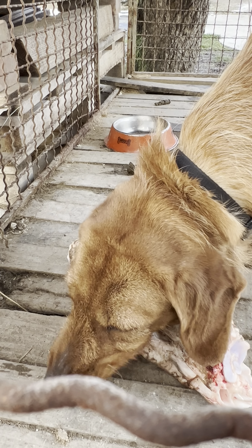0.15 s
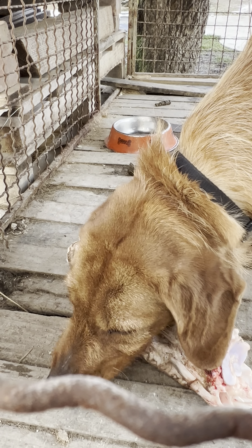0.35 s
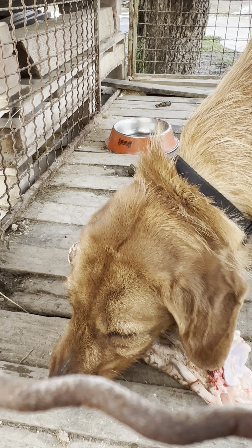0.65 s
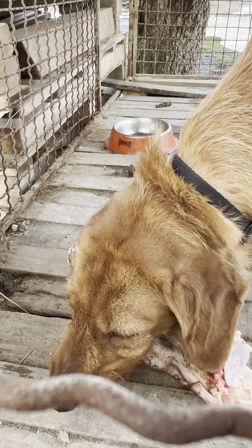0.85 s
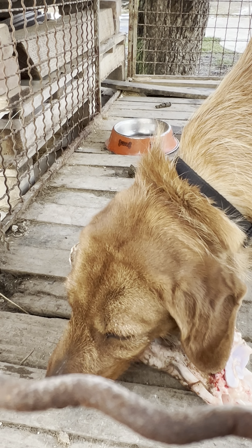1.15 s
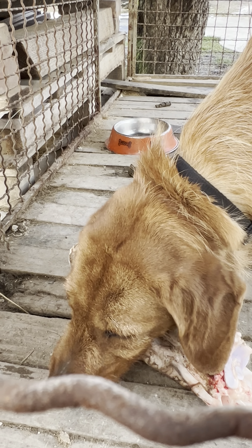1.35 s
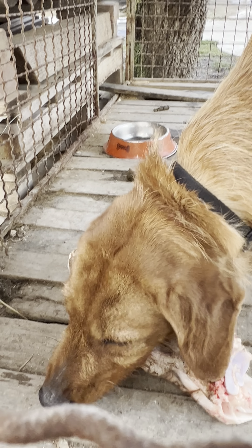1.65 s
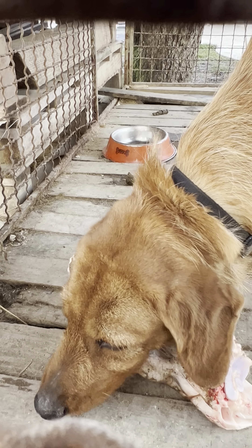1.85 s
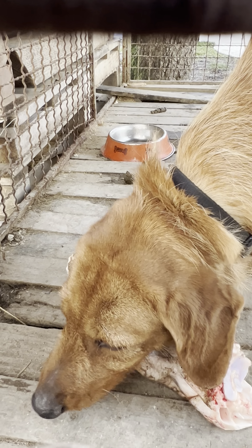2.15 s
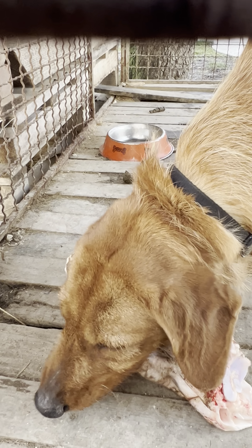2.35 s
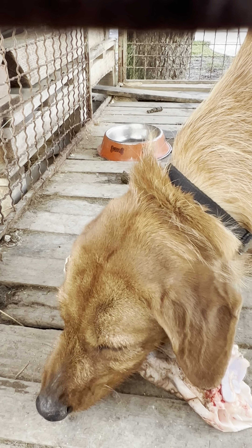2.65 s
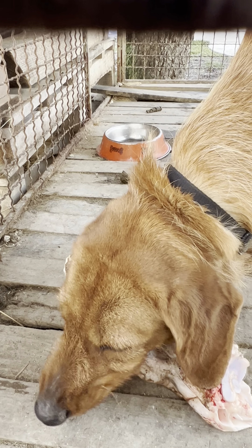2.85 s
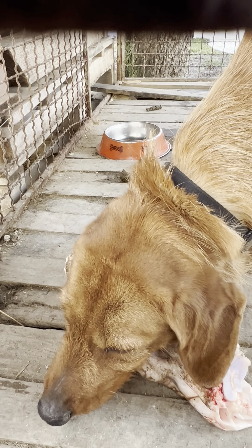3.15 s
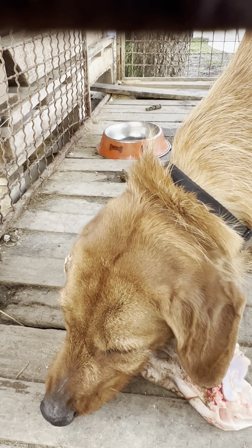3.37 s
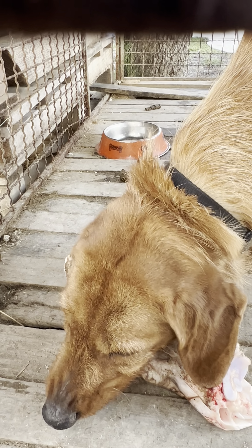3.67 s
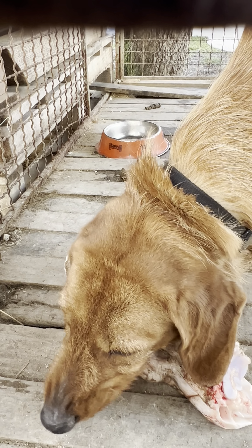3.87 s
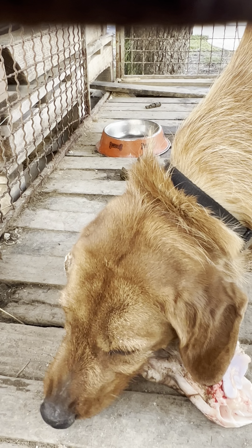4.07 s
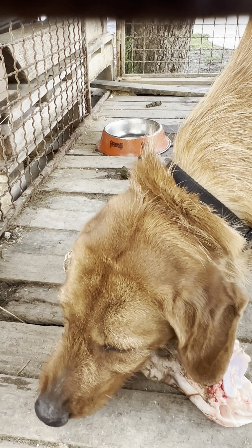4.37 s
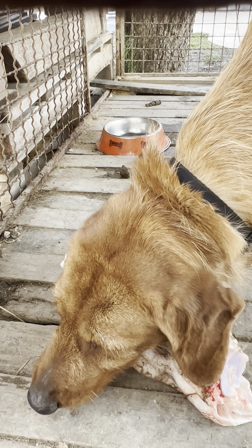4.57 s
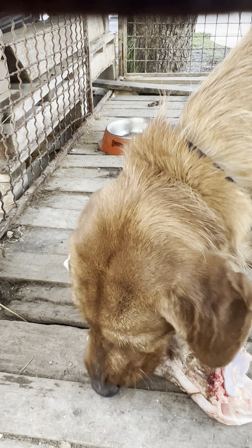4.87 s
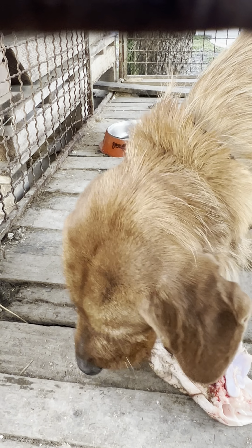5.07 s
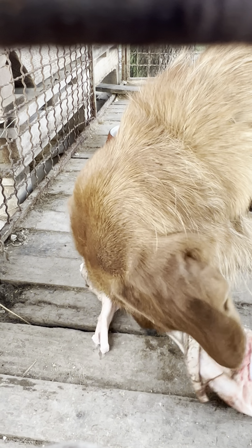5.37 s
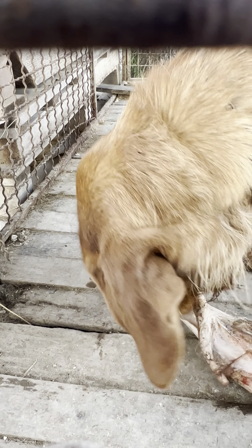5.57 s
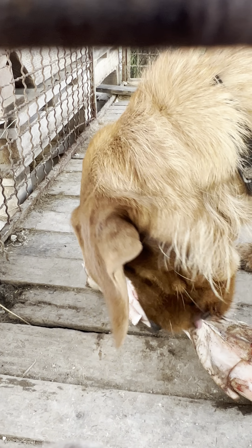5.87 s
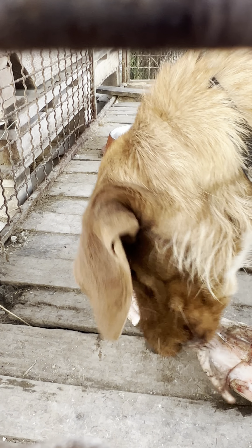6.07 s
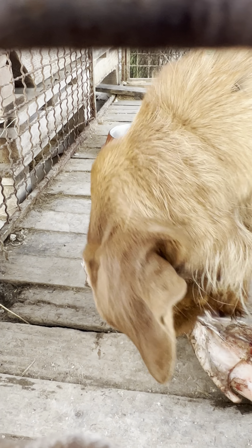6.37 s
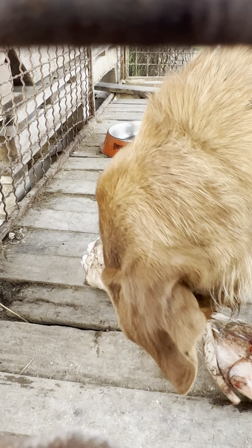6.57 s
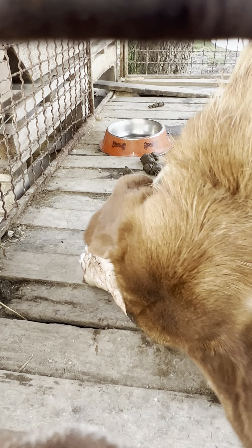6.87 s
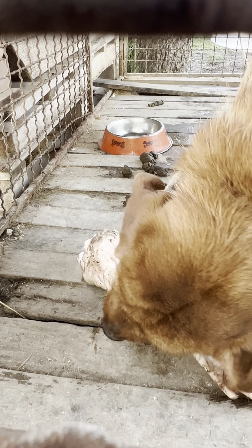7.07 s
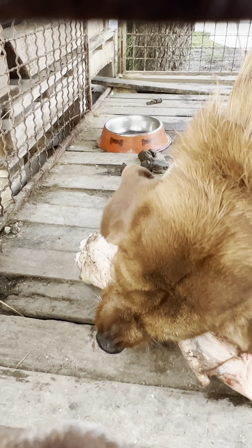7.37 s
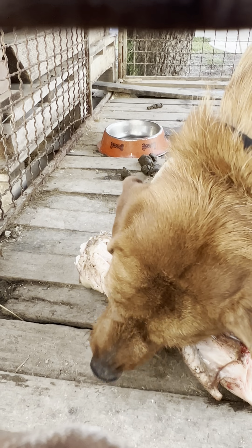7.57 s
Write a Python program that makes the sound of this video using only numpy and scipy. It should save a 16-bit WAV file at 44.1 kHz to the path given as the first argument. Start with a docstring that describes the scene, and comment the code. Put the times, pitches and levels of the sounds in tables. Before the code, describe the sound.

Close, irregular crunching of dog teeth on bone with wet mouth smacks, broken midway by a heavy thump and rattling planks.

```python
"""An outdoor pen with a plank floor: a dog gnaws a raw bone close to a phone with two microphone ports.
Teeth crack and scrape the bone, exciting its cavity, body and splinter modes; the wet mouth clicks.
Bone and paws knock the planks into damped vibration, and one blow sends a bending wave through them,
hard enough to shake the wire fence. Distant traffic rumbles under soft hiss and a few faint hoots."""
import sys
import numpy as np
from scipy import signal
from scipy.fft import rfft, irfft, next_fast_len
from scipy.io import wavfile
from scipy.ndimage import uniform_filter1d

SR = 44100
rng = np.random.default_rng(int(sys.argv[2]) if len(sys.argv) > 2 else 0)


def dump_mix(stems):
    """Bounce the given channels to the path in sys.argv[1] as a 16-bit WAV at rate SR."""
    frames = np.atleast_2d(stems).T  # one column per channel
    limited = np.clip(frames, -1, 1)  # hard clip at full scale
    pcm = np.round(limited * 32767).astype(np.int16)
    wavfile.write(sys.argv[1], SR, pcm)


N = 340452

# Spectrum of the outdoor hiss. Each row: frequency in Hz, relative density in dB.
AIR_SPECTRUM = [(12, -50), (20, -8), (68, -6), (399, -23.5), (690, -23.5), (810, -27.5), (930, -26),
                (2080, -24.5), (4180, -47), (4940, -47.5), (5680, -51), (8890, -40.5), (11100, -54.5),
                (13200, -69.5), (16000, -77.5)]
# Likeness of the hiss at the two ports. Each row: frequency in Hz, coherence from 0 to 1.
AIR_COHERENCE = [(60, 1), (200, 0.61), (700, 0.19), (2400, 0.47), (4400, 0.17), (9000, 0.2)]
# Traffic drone. Each row: time in seconds, level in dB.
TRAFFIC = [(0, -55.5), (.75, -57), (2, -55), (2.9, -57), (7.3, -57), (7.6, -70.5), (7.72, -62.5)]
# Distant hoots. Each row: start in seconds, length in seconds, pitch in Hz, level in dB.
HOOTS = [(.785, 0.08, 714, -59), (0.995, 0.057, 640, -64), (1.469, 0.057, 715, -54.5),
         (1.627, 0.057, 665, -54.5), (2.807, 0.089, 702, -63), (2.883, 0.11, 654, -68),
         (4.045, 0.092, 559, -56), (4.162, 0.038, 737, -56), (5.243, 0.061, 724, -59)]
# Swing of a loose plank. Each row: time in seconds, pitch in Hz, level in dB.
GROAN = [(4.512, 160, -45), (4.531, 169.4, -28.5), (4.559, 170.7, -39.5), (4.614, 130.7, -42.5),
         (4.674, 122, -39), (4.7, 114, -66)]
# Rattle of the shaken planks. Each row: time in seconds, level in dB.
SHAKING = [(3.08, -61), (3.12, -41), (3.25, -42.5), (3.5, -40.5), (3.85, -50), (3.95, -43), (4.2, -55.5),
           (4.45, -42), (4.6, -44.5), (4.79, -52.5), (4.9, -84)]
# Knocks: dull jaw thumps that follow the big crunches, and knocks and bounces on the planks. Each row: peak in
# seconds, level in dB, pitch in Hz, length in ms.
KNOCKS = [(0.309, -42.5, 226, 17), (0.64, -33, 198, 13), (0.982, -50, 267, 12), (1.298, -35.5, 170, 16),
          (1.402, -49, 289, 6.8), (2.363, -35.5, 186, 7.7), (2.603, -43.5, 180, 10),
          (2.652, -35, 200, 16.7), (3.13, -12, 183, 3.5), (3.157, -29, 148, 14),
          (3.181, -18.5, 156.4, 14.3), (3.221, -21, 159, 4.1), (3.262, -26, 154.6, 4.8),
          (3.297, -23.5, 132.8, 5.4), (3.384, -28.5, 140.7, 45), (3.444, -27.5, 129, 9.4),
          (3.524, -34, 144, 8.1), (3.753, -27.5, 187, 2.5), (3.874, -30, 227.4, 10),
          (3.89, -25, 231.5, 6.6), (3.903, -30, 227, 31), (3.997, -38.5, 193.6, 26), (4.3, -34, 221, 10.5),
          (4.477, -24.5, 203.5, 29.5), (4.507, -22.5, 152, 11), (5.316, -36.5, 246.7, 5.2),
          (5.75, -33.5, 233, 2.6), (5.909, -33.5, 250.4, 7.8), (6.435, -41, 143, 3.9),
          (6.732, -37.5, 283, 2.9), (7.21, -25.5, 175, 5.4)]
# Modes of the planks, the fence wires and the bone's cavity, body and splinters.
# Each row: frequency in Hz, bandwidth in Hz, relative gain in dB.
PLANK_MODES = [(101.6, 30, 4.5), (181, 104, 2), (238.6, 64, 1.5), (337, 120, -11.5)]
FENCE_MODES = [(285, 0.7, -18), (297.7, 1.7, -14.5), (352.3, 8.5, -21)]
CAVITY_MODES = [(352, 200, -6), (482, 60, 5), (670, 75, 1), (950, 110, 2), (1170, 110, 1)]
BONE_MODES = [(1020, 1500, -9), (1454, 230, -1), (1806, 208, -5), (2158, 212, -1.5), (2524, 470, -3.5),
              (3000, 1110, -4.5), (4310, 1400, -9)]
SPLINTER_MODES = [(4990, 1400, 2.5), (6250, 2730, 2.5), (8020, 2080, 6), (10280, 6000, 4.5),
                  (11900, 7400, -0.5), (14560, 2900, -5)]
# Strokes of bone over wood. Each row: start in seconds, end in seconds, level in dB.
DRAGS = [(3.043, 3.199, -49), (3.722, 3.787, -52), (4.256, 4.33, -50), (4.32, 4.51, -57.5),
         (4.862, 4.949, -56.5), (5.225, 5.322, -62), (5.881, 5.934, -57), (6.814, 6.845, -54),
         (7.16, 7.411, -57)]
# Grinding and smacking between the cracks. Each row: time in seconds, level in dB.
GRINDING = [(0, -59), (.36, -69.5), (.5, -59), (1.07, -68), (1.72, -64.5), (2.04, -58.5), (2.43, -64),
            (3.33, -67.5), (3.48, -60.5), (4.1, -65.5), (4.35, -68), (5.05, -77.5), (5.31, -68.5),
            (5.72, -71), (6.03, -69), (6.78, -72.5), (6.9, -78), (7.25, -65), (7.72, -68)]
# Hollow clacks of bone on wood.
# Each row: peak in seconds, cavity level in dB, length in ms, favoured cavity frequency in Hz.
CLACKS = [(.1804, -51, 8, 710), (1.195, -46.5, 7.4, 393), (1.289, -40.5, 20, 484), (1.5619, -45.5, 20, 656),
          (1.848, -51.5, 8.2, 834), (1.8823, -45.5, 4.9, 704), (2.2788, -49, 9.8, 654),
          (2.538, -42, 4.1, 660), (3.0932, -22.5, 6.3, 910), (3.1295, -41, 62, 416),
          (3.1753, -28.5, 3.8, 404), (3.4285, -28, 8.8, 767), (3.8717, -27.5, 4.2, 416),
          (3.888, -31, 4.7, 397), (3.898, -28, 4.4, 720), (3.9424, -53, 39, 900), (4.2996, -48, 52, 455),
          (4.4436, -50.5, 78, 692), (4.474, -45, 15, 400), (4.8645, -39, 7, 605), (5.0854, -45, 4.2, 1150),
          (5.2367, -50, 5, 950), (5.3147, -49, 21, 470), (5.4841, -49.5, 3.3, 640), (5.9176, -35, 6.7, 485),
          (5.9328, -45.5, 9.6, 458), (6.306, -46, 19.5, 476), (6.5927, -45.5, 6.5, 680),
          (6.7312, -43.5, 39, 478), (6.8225, -56, 17, 1200), (7.0711, -51, 4.9, 493),
          (7.1518, -49, 3.4, 514), (7.2178, -53, 96, 403), (7.4203, -48.5, 9.9, 920),
          (7.483, -50.5, 5.5, 958), (7.572, -48.5, 15, 930)]
# Wet mouth clicks.
# Each row: peak in seconds, treble level in dB, length in ms, favoured treble frequency in Hz.
CLICKS = [(0.044, -43.5, 1.7, 5460), (0.3397, -47, 5.1, 8400), (0.3986, -42.5, 1.4, 7580),
          (0.589, -45, 4.1, 7200), (0.816, -50, 3.7, 8300), (1.0676, -48, 3, 8560), (1.252, -45, 7.1, 7400),
          (1.3166, -27.5, 0.76, 8750), (1.454, -46, 5.5, 6560), (1.555, -41, 1.9, 6060),
          (1.7556, -38.5, 1.1, 6760), (1.7885, -39.5, 1.5, 9000), (1.9495, -39, 6.8, 9400),
          (2.16, -46, 2.2, 7000), (2.206, -44.5, 2.6, 6560), (2.2407, -46.5, 3.5, 9020),
          (2.252, -42.5, 2, 6040), (2.453, -44, 2.5, 7450), (2.525, -43.5, 2.5, 6360),
          (2.695, -48, 5.2, 8800), (2.818, -41, 6.8, 8100), (2.91, -39.5, 4.5, 5830), (3.136, -42, 2, 7950),
          (3.151, -50, 1.8, 8700), (3.275, -46, 4.9, 9200), (3.324, -34, 1.9, 7500),
          (3.467, -51, 6.4, 8390), (3.491, -51.5, 14, 8000), (3.575, -43, 4.6, 5900),
          (3.671, -41, 2.2, 8380), (3.676, -36, 3.3, 8800), (3.686, -38, 4.1, 9370), (3.725, -45, 3, 8500),
          (4.0282, -40.5, 2.3, 8500), (4.128, -40.5, 2.4, 7600), (4.257, -34, 3, 6520),
          (4.3232, -40.5, 3.8, 9300), (4.6034, -48.5, 3.3, 8400), (5.135, -48.5, 2.2, 8100),
          (5.2915, -47, 4.4, 6900), (5.3827, -54, 4, 5650), (5.77, -51.5, 4.7, 8400),
          (6.024, -52, 37, 8700), (6.256, -56.5, 2.1, 6500), (6.8, -54, 12, 8060),
          (6.834, -51.5, 2.6, 8600), (7.092, -50, 3, 6100), (7.304, -53, 4.5, 6500),
          (7.3438, -41, 5.4, 6200), (7.384, -51.5, 3, 7900), (7.415, -51, 6.5, 6760),
          (7.6625, -48, 1.7, 9830)]
# Cracks of teeth on bone, and the sharp ticks of bone striking wood. Each row: peak in seconds,
# body level in dB, treble relative to it in dB, length in ms, favoured body frequency in Hz.
CRACKS_AND_TICKS = [(0.091, -47.5, -26, 8.8, 1770), (0.2896, -28, -8, 12.2, 1590),
                    (0.2956, -23.5, -6, 4.4, 2470), (0.3021, -36.5, -1.5, 22, 2600),
                    (0.4162, -42, -8, 1.7, 2320), (0.54, -32.5, -9.5, 1.8, 1390),
                    (0.622, -25, -7, 8.6, 1940), (0.6307, -23.5, -3, 3.5, 1510),
                    (0.787, -46.5, -13, 4.1, 2400), (0.909, -41.5, -5.5, 3.5, 1540),
                    (0.9739, -28.5, -12.5, 10, 1470), (1.095, -51.5, -2.5, 29, 2320),
                    (1.1364, -45, -14, 1.8, 2510), (1.1933, -43, -19, 5.1, 1290),
                    (1.284, -32.5, -8, 16, 1800), (1.4002, -39, -5.5, 3, 2370),
                    (1.5634, -44, -9, 5.1, 1420), (1.664, -39.5, -3, 14, 1720),
                    (1.694, -43, -25, 3.2, 2220), (1.815, -41.5, -26, 3.4, 2550),
                    (1.979, -34.5, -5.5, 12, 1640), (2.094, -48, -3, 4.4, 2500),
                    (2.3425, -48.5, -6.5, 38, 2550), (2.3554, -41.5, -6, 15, 1750),
                    (2.4135, -48, 0, 3, 2430), (2.4907, -39.5, -34, 2.9, 2660),
                    (2.5973, -42.5, -1, 5.1, 2220), (2.637, -29, -7.5, 14.6, 1980),
                    (2.9583, -46.5, -23, 5.5, 1450), (2.971, -43.5, -8, 5.4, 1440),
                    (3.0248, -29.5, -7.5, 14.3, 1290), (3.0711, -43, -22, 6.2, 1980),
                    (3.0917, -28.5, -24, 0.89, 4150), (3.161, -37.5, 5.5, 0.85, 1080),
                    (3.1693, -41, -24, 4.7, 3150), (3.2152, -40.5, -8, 3.3, 1390),
                    (3.3127, -32.5, -7, 12.6, 1600), (3.613, -47, 1.5, 4.4, 1340),
                    (3.65, -26.5, -8.5, 12, 1700), (3.779, -44.5, -33, 5.2, 2300),
                    (3.8316, -37, -7, 2.9, 2300), (3.871, -37, -21, 1.5, 4200),
                    (3.888, -40, -18, 1.8, 4200), (3.897, -37, -21, 2.2, 4300),
                    (3.9808, -38.5, -11, 29, 1360), (3.9877, -36.5, -4, 8.8, 2040),
                    (4.057, -39.5, -5.5, 2, 2500), (4.103, -42.5, 1, 2.7, 2600),
                    (4.1125, -43, -10, 5.1, 2660), (4.2433, -43, -4, 4.7, 1390),
                    (4.7179, -52.5, -2.5, 33, 1910), (5.2355, -51, -7, 6.5, 2110),
                    (5.2845, -46, 5, 1.5, 3200), (5.432, -50, -1.5, 5.4, 3740),
                    (5.9081, -50.5, -5.5, 42, 2260), (5.948, -42.5, -15, 1.5, 2020),
                    (6.435, -56.5, 0, 29, 2530), (6.5456, -51.5, -10, 12, 2450),
                    (6.628, -51.5, -3.5, 4.4, 1770), (6.7012, -50.5, -10, 7.6, 2780),
                    (7.324, -46.5, 3.5, 11, 2360), (7.3299, -37.5, -14, 3.3, 2450),
                    (7.338, -40.5, -13, 5.7, 2520), (7.562, -51.5, -12, 11.5, 1660)]
# Phase between the ports. Each row: frequency in Hz, lead of the left in radians.
PORT_PHASE = [(0, 0), (690, -1.3), (1380, -0.0), (4130, -0.3), (4910, -2.7), (5510, -6.1), (5770, -6.2),
              (7490, -6.7), (12800, -9.3), (16200, -9.6)]
# Balance of the ports. Each row: frequency in Hz, left minus right in dB.
PORT_BALANCE = [(60, -4), (180, 5.5), (550, -0.5), (1650, -3), (4970, 1.5), (15000, -1)]

BLOW_S = 3.0863
EVENT_SAMPLES = 4000


def amp(db):
    """Amplitude ratio of a level in dB."""
    return 10 ** (np.asarray(db) / 20)


def unit_rms(x):
    """Normalisation to an rms of 1."""
    return x / np.sqrt(np.mean(x ** 2) + 1e-20)


def spectrum_at(points, hz):
    """Interpolation of a table on a log-frequency axis."""
    table_hz, value = np.transpose(points)
    return np.interp(np.log(hz + 1), np.log(table_hz + 1), value)


def curve(rows):
    """Linear interpolation of a level table at every sample."""
    return np.interp(np.arange(N) / SR, *np.transpose(rows))


def wander(noise, size):
    """Two moving averages leave a slow fluctuation of rms 1."""
    return unit_rms(uniform_filter1d(uniform_filter1d(noise, size), size))


def add(mix, start_s, sound):
    """Superposition of a sound on the mix."""
    part = mix[round(start_s * SR):][:len(sound)]
    part += sound[:len(part)]


def swell(length_s, rise_share, exponent=1):
    """Exponential growth and decay about t = 0; returns time and envelope."""
    t = np.arange(EVENT_SAMPLES) / SR - .03
    time_constant = np.where(t < 0, rise_share, 1 - rise_share) * length_s
    return t, np.exp(-(abs(t) / time_constant) ** exponent)


def ring(x, modes):
    """Modal resonance: two-pole filters share one drive or take a row each; the sum has rms 1."""
    out, drives = 0, np.broadcast_to(x, (len(modes), x.shape[-1]))
    for k, ((hz, width, db), drive) in enumerate(zip(modes, drives)):
        out = out + (-1) ** k * amp(db) * signal.lfilter(*signal.iirpeak(hz, hz / width, SR), drive)
    return unit_rms(out)


def favour(modes, hz, octaves, floor):
    """The point of contact weights the modes: those near hz are driven most."""
    mode_hz = np.transpose(modes)[0][:, None]
    return floor + np.exp(-(np.log2(mode_hz / hz) / octaves) ** 2)


def air(level_db=-57.5, patch_db=2.2):
    """Partial coherence: outdoor hiss with drifting patches is only partly shared by the ports."""
    frames, hz = N // 256 + 5, np.fft.rfftfreq(1024, 1 / SR)
    left_re, left_im, own_re, own_im, patches = rng.standard_normal((frames, 513, 5)).T
    patches = unit_rms(uniform_filter1d(uniform_filter1d(patches, 12, axis=0), 10, axis=1))
    coherence = spectrum_at(AIR_COHERENCE, hz)[:, None]
    left = left_re + 1j * left_im
    right = coherence * left + np.sqrt(1 - coherence ** 2) * (own_re + 1j * own_im)
    traffic_db = curve(TRAFFIC)[np.minimum(np.arange(frames) * 256, N - 1)]
    wash_db = (hz[:, None] < 330) * (traffic_db - traffic_db.mean())  # the bass follows the traffic
    gain = amp(spectrum_at(AIR_SPECTRUM, hz)[:, None] + patch_db * patches + wash_db)
    _, hiss = signal.istft(np.array([left, right]) * gain, nperseg=1024, noverlap=768)
    return amp(level_db) * unit_rms(hiss[:, :N])


def traffic():
    """Narrow-band noise: distant traffic drones near 60 Hz."""
    bass = ring(rng.standard_normal(N), [(63.6, 35, 0)])
    return amp(curve(TRAFFIC)) * ring(bass, [(59.0, 12, 0)])


def hoots(waver=0.043):
    """Random frequency modulation makes soft, distant tones waver."""
    out = np.zeros(N)
    for (start, length, hz, db), noise in zip(HOOTS, rng.standard_normal((len(HOOTS), 8000))):
        drift = unit_rms(uniform_filter1d(noise, 900))[:round(length * SR)]
        phase = 2 * np.pi * np.cumsum(hz * (1 + waver * drift)) / SR
        add(out, start, amp(db) * signal.windows.hann(len(drift)) ** .5 * np.sin(phase))
    return out


def plank_groan(lumps_db=3, upper_db=-10):
    """Free vibration: a loose plank swings on unevenly in two modes and sags in pitch."""
    times, hz, db = np.transpose(GROAN)
    t, out = np.arange(times[0], times[-1], 1 / SR), np.zeros(N)
    envelope = amp(np.interp(t, times, db) + lumps_db * wander(rng.standard_normal(len(t)), 300))
    phase = 2 * np.pi * np.cumsum(np.interp(t, times, hz)) / SR
    add(out, times[0], envelope * (np.sin(phase) + amp(upper_db) * np.sin(1.45 * phase)))
    return out


def shaking(bumps_per_s=300, fence_db=-45, fence_t60_s=4.3):
    """Forced vibration: random bumps rattle the planks and set the fence wires humming after the blow."""
    bumps = uniform_filter1d(rng.standard_normal(N) * (rng.random(N) < bumps_per_s / SR), 40)
    t = np.arange(N) / SR
    active = (t > SHAKING[0][0]) & (t < SHAKING[-1][0])
    rattle = amp(curve(SHAKING)) * ring(bumps, PLANK_MODES)
    hum = amp(fence_db - 60 * (t - BLOW_S) / fence_t60_s) * ring(bumps, FENCE_MODES)
    return active * (rattle + hum)


def blow(gain_db=9.6, t60_s=0.061, arrival_s=0.0074, lowest_hz=8, dispersion_s=.0195):
    """Dispersion of a bending wave in the planks: high frequencies arrive first, the deep swing last."""
    t, out = np.arange(1, 8000) / SR, np.zeros(N)
    envelope = np.exp(-(arrival_s / t) ** 4) * amp(gain_db - 60 * t / t60_s)
    add(out, BLOW_S, envelope * np.cos(2 * np.pi * (lowest_hz * t - dispersion_s / t)))
    return out


def knocks(upper_db=-6.5, scuff_db=2.0):
    """Damped oscillation of the thumping jaw and of struck planks, whose pitch sags as the higher waves leave
    first."""
    out, scuffs = np.zeros(N), rng.standard_normal((len(KNOCKS), EVENT_SAMPLES))
    for (peak_s, db, hz, ms), start_cycle, scuff in zip(KNOCKS, rng.random(len(KNOCKS)), scuffs):
        t, envelope = swell(ms / 1000, rise_share=0.23)
        pitch = hz * (1 - .1 * np.tanh(t * 1000 / ms))
        phase = 2 * np.pi * (np.cumsum(pitch) / SR + start_cycle)
        swing = envelope * np.sin(phase) + amp(upper_db) * envelope ** 2 * np.sin(1.4 * phase)
        add(out, peak_s + t[0], amp(db + scuff_db * wander(scuff, 70)) * swing)
    return out


def drags(slips_per_s=500, spread_db=3.5):
    """Stick-slip friction of bone on wood grain excites the cavity and one body mode."""
    slips = amp(spread_db * rng.standard_normal(N)) * rng.choice([-1., 1.], N)
    slips *= rng.random(N) < slips_per_s / SR
    strokes = np.zeros(N)
    for start, end, db in DRAGS:
        add(strokes, start, amp(db) * signal.windows.tukey(round((end - start) * SR), .6))
    return strokes * ring(slips, CAVITY_MODES + BONE_MODES[1:2])


def grinding(ticks_per_s=45, spread_db=(3.5, 3.0), decay_s=(.0006, .0012), lick_db=-5.0, swell_db=6):
    """Amplitude-modulated noise: fine ticks, softer wet smacks and a swelling lick excite the bone."""
    sizes = amp(np.array(spread_db)[:, None] * np.minimum(rng.exponential(1, (2, N)), 3.))
    impulses = sizes * (rng.random((2, N)) < ticks_per_s / SR)  # one row of ticks, one of smacks
    lick = amp(lick_db + swell_db * unit_rms(uniform_filter1d(rng.standard_normal(N), 2500)))
    poles = np.exp(-1 / (np.array(decay_s) * SR))  # used as double poles, for a soft onset
    envelopes = (signal.lfilter([1], [1, -2 * p, p ** 2], row) for p, row in zip(poles, impulses))
    treble, body = ((unit_rms(envelope) + lick) * rng.standard_normal(N) for envelope in envelopes)
    # The mouth shifts the colour of the smacks.
    mouth_hz = np.repeat(2100 * 2 ** (.5 * rng.standard_normal(N // 800 + 1)), 800)[:N]
    smacks = ring(body * favour(BONE_MODES, mouth_hz, octaves=.3, floor=.3), BONE_MODES)
    return amp(curve(GRINDING)) * (ring(treble, SPLINTER_MODES) + amp(0.5) * smacks)


def burst(levels_db, favoured_hz, ms, rise_share, lumps_db=4.5, crumbs_db=-25.5, snap=0.56):
    """Impulsive excitation: uneven breaks ring cavity, body and splinters; returns time and sound."""
    t, core = swell(0.72 * ms / 1000, rise_share, exponent=0.99)
    _, crumbs = swell(1.71 * ms / 1000, 0.89 * rise_share)
    envelope = core + amp(crumbs_db) * crumbs
    noise, lumps = rng.standard_normal((2, 3, EVENT_SAMPLES))
    breaks = envelope * noise * amp(lumps_db * unit_rms(uniform_filter1d(lumps, 25)))
    breaks[:, np.argmax(core)] += snap * np.linalg.norm(breaks, axis=1)  # one hard break at the peak
    thud = uniform_filter1d(breaks[0] * np.sqrt(core), 12)
    cavity_hz, body_hz, treble_hz = favoured_hz
    cavity = ring(thud * favour(CAVITY_MODES, cavity_hz, octaves=.25, floor=.35), CAVITY_MODES)
    body = ring(breaks[1] * favour(BONE_MODES, body_hz, octaves=.3, floor=.4), BONE_MODES)
    treble = ring(breaks[2] * favour(SPLINTER_MODES, treble_hz, octaves=.44, floor=.4), SPLINTER_MODES)
    return t, amp(levels_db) @ np.array([cavity, body, treble]) * np.sqrt(np.mean(envelope ** 2))


def gnawing(cavity_hz=540, treble_hz=7350):
    """Fracture and impact: cracks and ticks excite mostly the body, clicks treble, clacks the cavity."""
    def rise(ms):
        """Short snaps start at once; long crunches build."""
        return np.clip(0.033 * ms, 0.029, 0.44)

    cracks_and_ticks = [(peak_s, burst([db - 14, db, db + treble_db], (cavity_hz, hz, treble_hz),
                                       ms, rise(ms)))
                        for peak_s, db, treble_db, ms, hz in CRACKS_AND_TICKS]
    clicks = [(peak_s, burst([db - 15.5, db - 9.5, db], (cavity_hz, 2280, hz), ms, rise(ms)))
              for peak_s, db, ms, hz in CLICKS]
    clacks = [(peak_s, burst([db, db - 13, db - 27.5], (hz, 1072, treble_hz), ms, rise_share=0.32))
              for peak_s, db, ms, hz in CLACKS]
    out = np.zeros(N)
    for peak_s, (t, sound) in cracks_and_ticks + clicks + clacks:
        add(out, peak_s + t[0], sound)
    return out


def pen_reflections(x, t60_s=0.075, first_s=0.0017):
    """Scattering from planks, kennel and fence gives each port its own short train of echoes."""
    t = np.arange(5000) / SR
    taps = rng.choice([-1., 1.], (2, len(t))) * (rng.random((2, len(t))) < .06)
    taps *= (t > first_s) * amp(-60 * t / t60_s)
    return signal.fftconvolve(x[None], taps / np.linalg.norm(taps[0]), axes=1)[:, :N]


def ports(x):
    """Direct sound reaches the two ports with phase and level offsets that depend on frequency."""
    size = next_fast_len(N + 4096)
    hz = np.fft.rfftfreq(size, 1 / SR)
    half_offset = amp(spectrum_at(PORT_BALANCE, hz) / 2) * np.exp(.5j * spectrum_at(PORT_PHASE, hz))
    return irfft(rfft(x, size) * np.array([half_offset, 1 / half_offset]), size)[:, :N]


def scene():
    """Superposition: bone and hoots come directly and by echo, low sounds nearly alike at both ports."""
    direct = gnawing() + grinding() + drags() + hoots()
    floor = knocks() + blow() + shaking() + plank_groan()
    lean_left = amp([[.2], [-.2]])
    return ports(direct) + amp(-12.0) * pen_reflections(direct) + lean_left * floor + traffic() + air()


def record(dry, low_hz=42, high_hz=15900):
    """Band limiting: the microphone cuts the deepest bass, then a low-pass cuts the top treble."""
    bass_cut = signal.sosfilt(signal.butter(3, low_hz, "high", fs=SR, output="sos"), dry)
    low_pass = signal.firwin(511, high_hz, window=("kaiser", 9), fs=SR)
    return signal.oaconvolve(bass_cut, low_pass[None], "same")


dry = scene()
out = record(dry)
dump_mix(out)
```